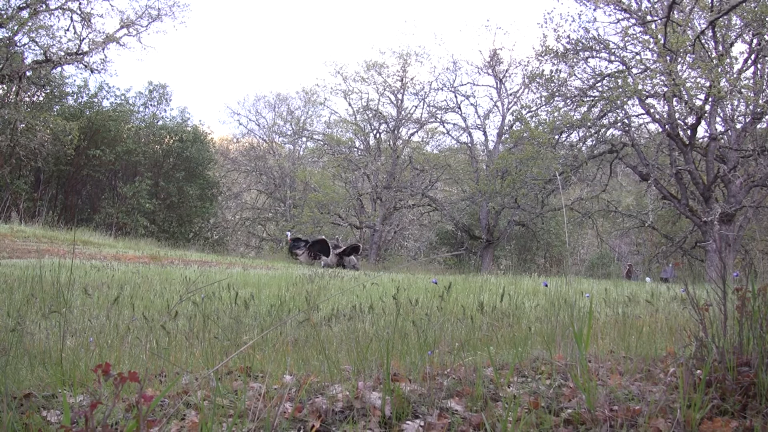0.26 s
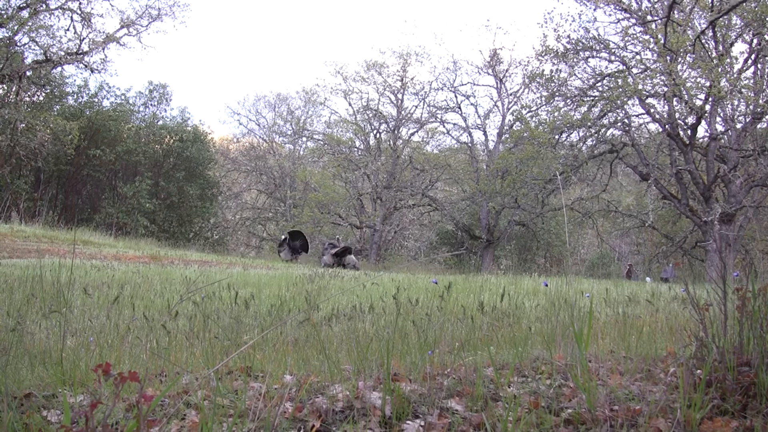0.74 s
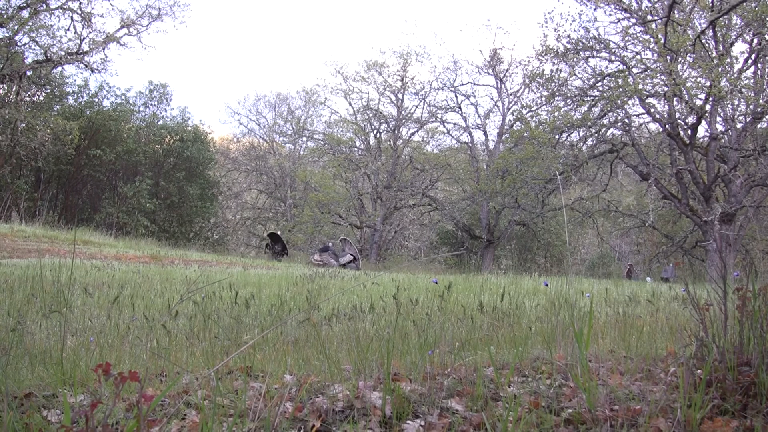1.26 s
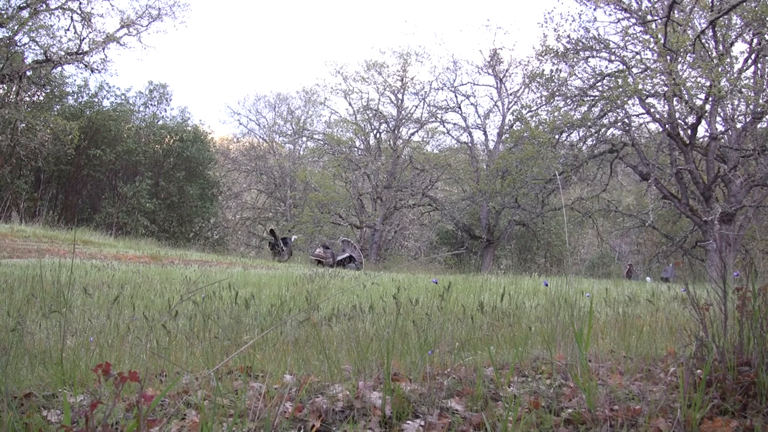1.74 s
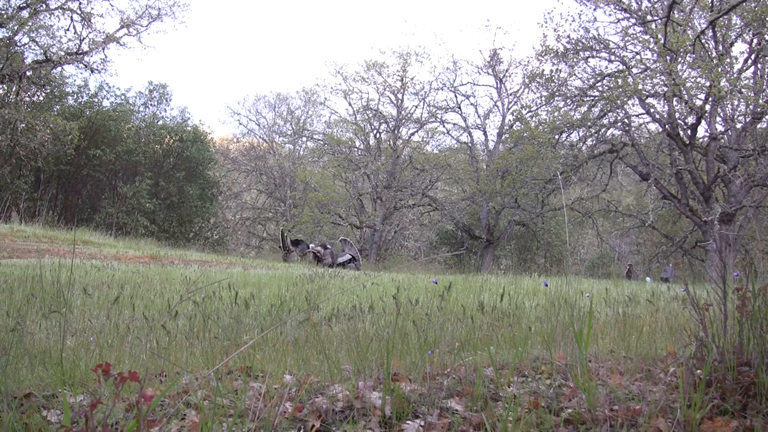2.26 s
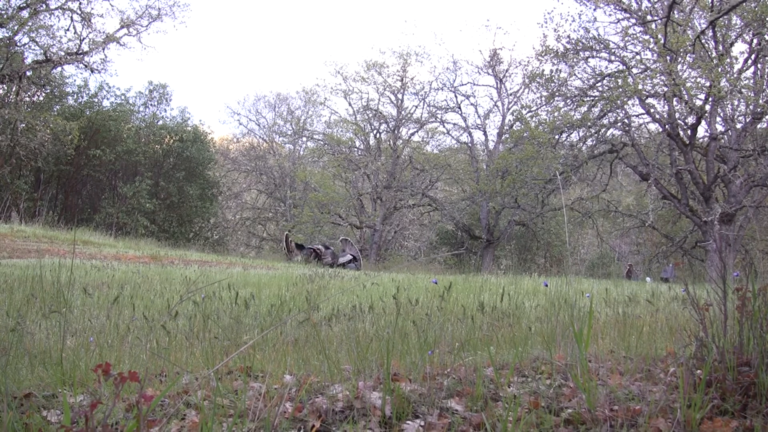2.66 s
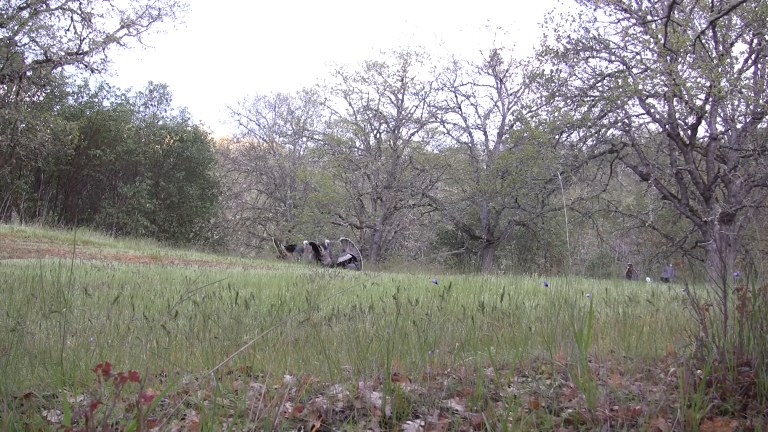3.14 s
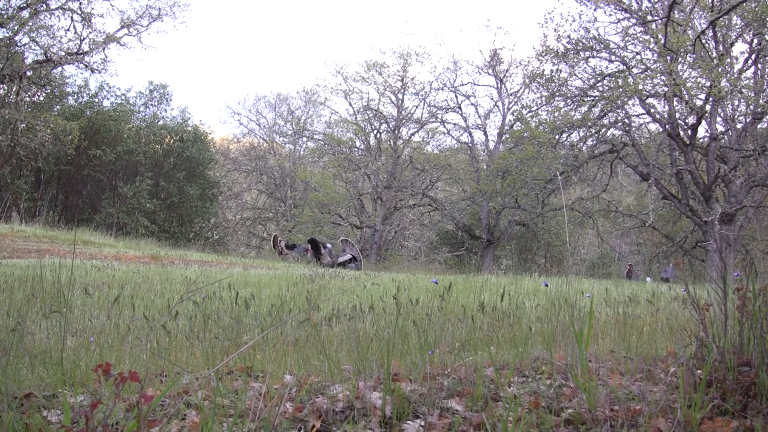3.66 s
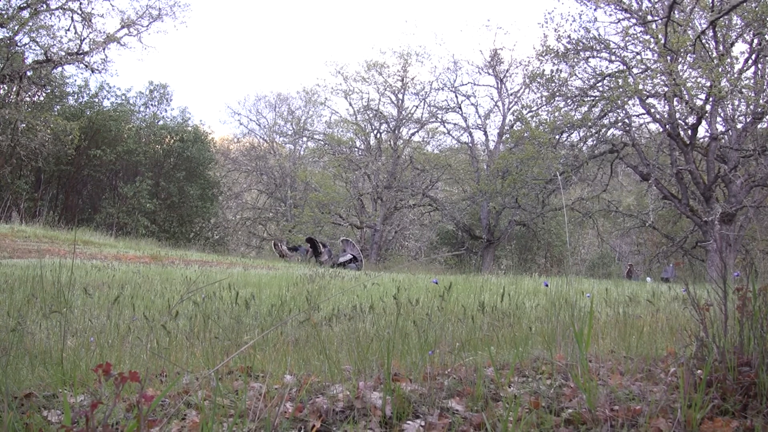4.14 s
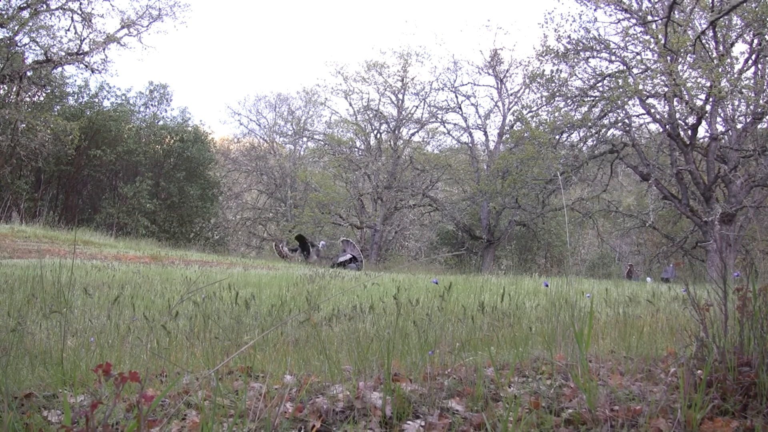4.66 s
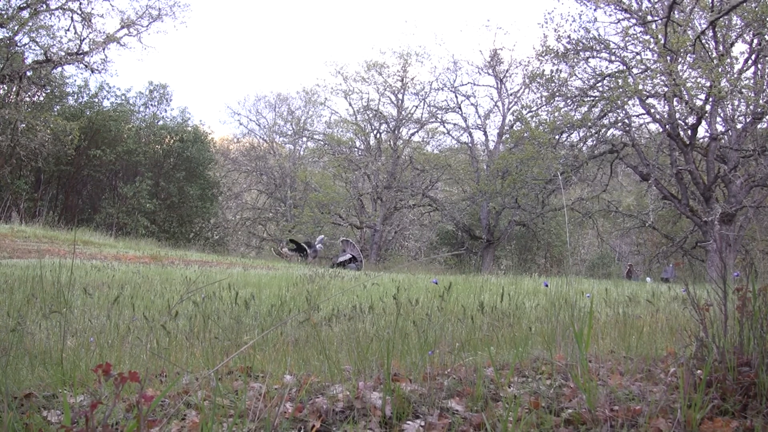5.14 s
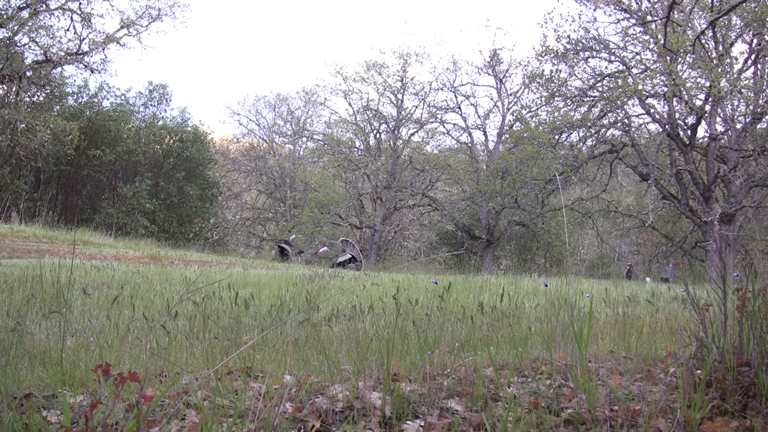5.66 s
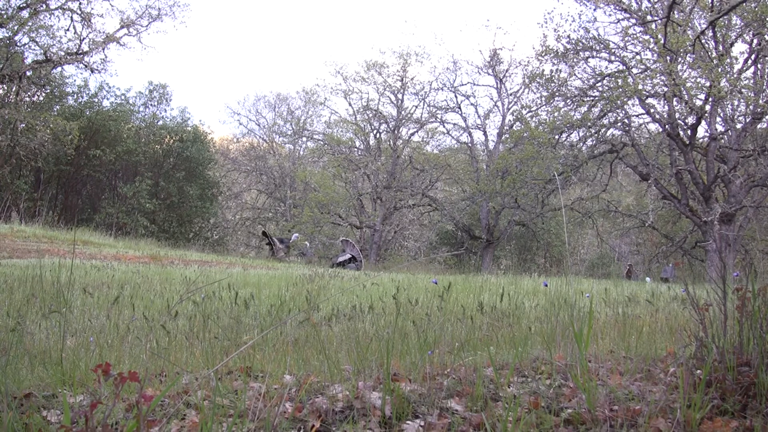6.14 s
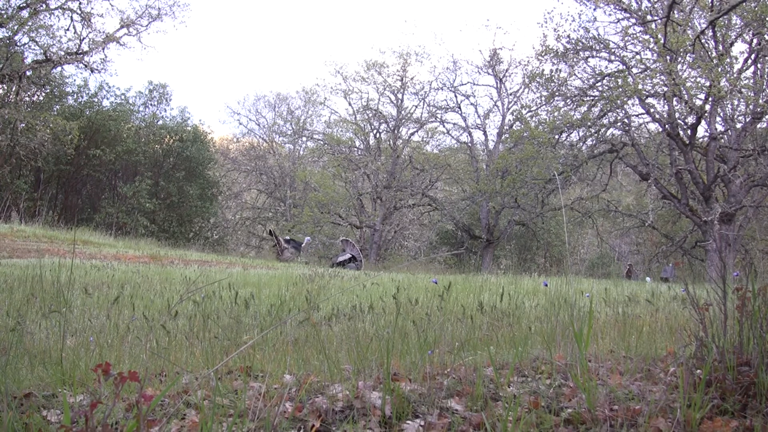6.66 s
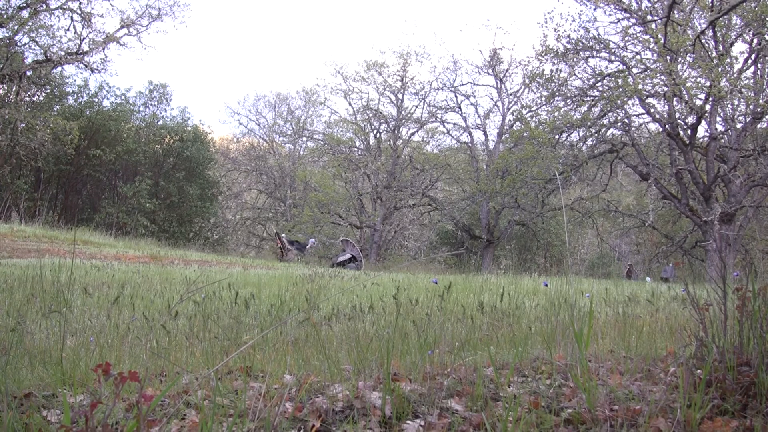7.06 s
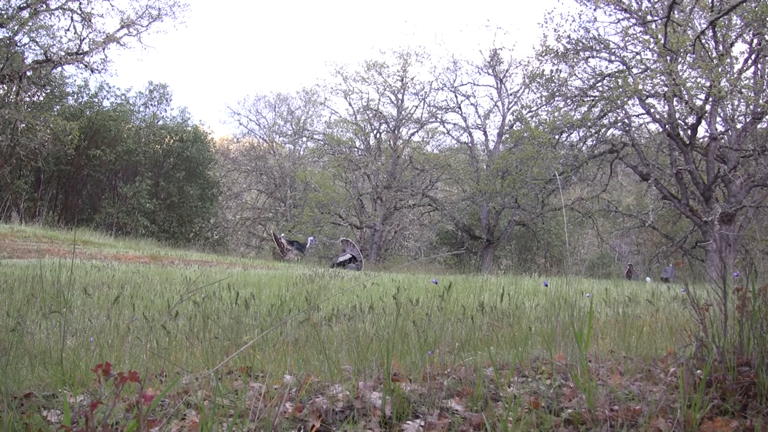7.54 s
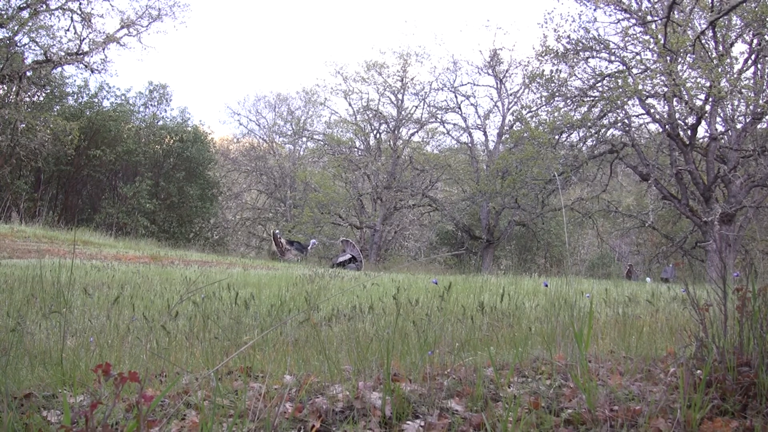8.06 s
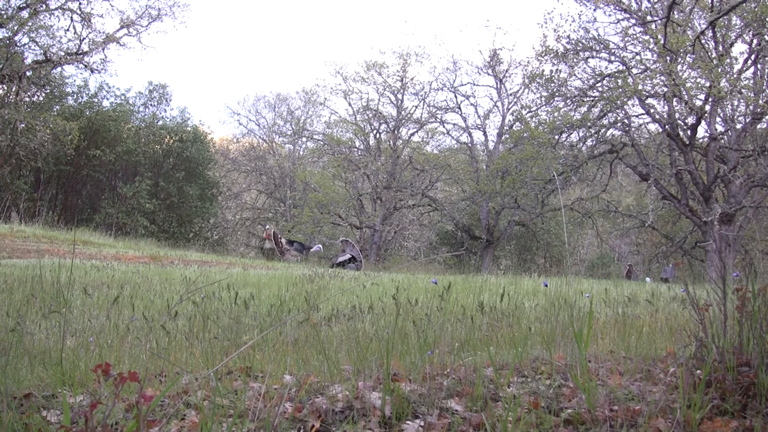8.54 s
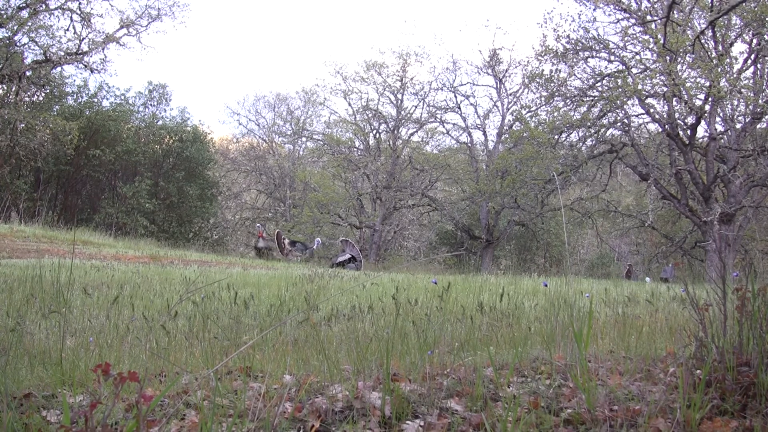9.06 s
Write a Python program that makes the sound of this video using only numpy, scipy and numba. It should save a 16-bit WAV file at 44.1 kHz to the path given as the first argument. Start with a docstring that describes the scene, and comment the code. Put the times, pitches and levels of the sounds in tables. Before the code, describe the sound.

Stereo outdoor pickup, close to a hen turkey and far from the others. First a songbird's sliding whistle and fast repeated chirps, with dull bumps and brief rustling near the microphone. Then a low murmur, a stuttered cluck and five evenly spaced, very loud raspy yelps, the background dipping after each. A one-second tumbling gobble from distant males follows with light echo from trees, then calm airy hiss with sparse hoarse clucks.

```python
"""A spring meadow: faint wind and rumble lie far off under an even hiss. A small bird whistles in even phrases;
soft bumps (damped modes) and dry rustles (grainy noise) come from near the microphone, and hoarse, rising
clucks from afar. Right beside the microphone a hen murmurs, clucks and gives five loud yelps whose voice
breaks to half and quarter pitch; toms across the grass answer with a rattling gobble of climbing syllables.
Bird and clucks return once more. The recorder's gain control ducks the background after every yelp."""
import sys
import numpy as np
from scipy import signal
from scipy.fft import rfft, irfft
from scipy.io import wavfile
from scipy.ndimage import map_coordinates
from numba import njit

SR = 44100
rng = np.random.default_rng(int(sys.argv[2]) if len(sys.argv) > 2 else 0)


def digitize_waveform(pressure):
    """Quantize a signal to 16-bit integers and store it at the path in sys.argv[1].

    Rows of a 2-D input are taken as channels; values are limited to [-1, 1].
    """
    field = np.atleast_2d(pressure).T
    bounded = np.clip(field, -1, 1)
    quanta = np.round(bounded * 32767).astype(np.int16)
    wavfile.write(sys.argv[1], SR, quanta)


N = 410571


def undb(db):
    """Decibels to gain."""
    return 10 ** (np.asarray(db) / 20)


def unit(x):
    """Scale to rms 1."""
    return x / np.sqrt(np.mean(x ** 2) + 1e-18)


def clock(length):
    """Sample times of an event."""
    return np.arange(max(int(length * SR), 32)) / SR


def add(track, start, x):
    """Mix an event into a track."""
    i = int(start * SR)
    track[i:i + len(x)] += x[:max(N - i, 0)]


def wobble(n, rate):
    """Smooth chance with a spread of about 1 and `rate` new values a second."""
    knots = rng.standard_normal(4096)
    return map_coordinates(knots, [np.arange(n) * rate / SR], order=3, mode="wrap")


def swell(u, edge):
    """Window over u = 0..1 with rounded edges of the given share."""
    return np.sin(np.pi / 2 * np.clip(np.minimum(u, 1 - u) / edge, 0, 1)) ** 2


def running_phase(pitch):
    """Phase [rad] of a tone whose pitch [Hz] changes from sample to sample."""
    return 2 * np.pi * np.cumsum(pitch) / SR


def curve(points, hz):
    """Read (frequency [Hz], level [dB]) points on a log-frequency axis."""
    f, db = np.transpose(points)
    return np.interp(np.log(hz + 1), np.log(f), db)


def colour(x, points):
    """Causal minimum-phase filter with the given (frequency [Hz], gain [dB]) response."""
    size = 2048
    cepstrum = irfft(np.log(undb(curve(points, np.fft.rfftfreq(size, 1 / SR)))))
    # fold the cepstrum forward in time so the filter never rings ahead of the sound
    cepstrum[1:size // 2] *= 2
    cepstrum[size // 2 + 1:] = 0
    return signal.fftconvolve(x, irfft(np.exp(rfft(cepstrum))))[:len(x)]


def meadow(x, pan_db, echo_db, t60):
    """Direct sound plus thin scatter from the tree line, partly alike in both ears."""
    t = clock(1.1)
    decay = undb(-60 * t / t60) * (1 - np.exp(-t / .015))
    shared, left, right = rng.standard_normal((3, len(t))) * decay
    ears = []
    for own in (left, right):
        scatter = unit(shared + .5 * own) / np.sqrt(len(t))
        ears.append(x + undb(echo_db) * signal.fftconvolve(x, scatter)[:N])
    return np.array(ears) * undb(np.array([[pan_db], [-pan_db]]) / 2)  # positive pan leans left


# spectrum of the distant air: (frequency [Hz], relative level [dB])
AIR_SPECTRUM = [(15, -47.5), (25, -37), (43, -11), (183, 0.5), (404, -6.5), (506, -2.5), (649, -3),
                (874, -4), (1150, -10), (1840, -24), (2190, -24), (2360, -30.5), (2670, -27.5), (7230, -35),
                (9500, -45), (12400, -76), (20900, -120)]
# its width, before a further 1 dB cut of the side: (frequency [Hz], side minus mid [dB])
AIR_WIDTH = [(60, -11), (100, -5), (180, -8), (320, -6), (560, -5), (980, -9), (1720, -5), (3000, -1.5),
             (5240, 0), (9170, 1)]
# its loudness through the take, before flicker and pan: (time [s], level [dB])
AIR_LEVEL = [(0, -43), (1.1, -44.5), (2.7, -43.5), (4.5, -44.5), (6.3, -44), (9.3, -45)]


def air(flicker_db=0.9, pan_db=2):
    """Far-off wind and rumble, wavering slightly, under an even hiss: two shaped noises, mid and side."""
    hz = np.fft.rfftfreq(N, 1 / SR)
    mid, side = (rfft(rng.standard_normal(N)) * undb(curve(AIR_SPECTRUM, hz)) for _ in range(2))
    mid, side = irfft(mid, N), irfft(side * undb(curve(AIR_WIDTH, hz) - 1), N)
    db = np.interp(np.arange(N) / SR, *np.transpose(AIR_LEVEL)) + flicker_db * wobble(N, 12)
    ears = np.array([[1], [-1]])
    return (mid + ears * side) / mid.std() * undb(db) * undb(ears * pan_db / 2)


# songbird syllables by name: (length [s], buzz depth [Hz], pitch contour [Hz])
BIRD_SYLLABLES = {"slide": (0.223, 0, [4650, 3950, 3510, 3490, 3396, 2750, 2500, 2340]),
                  "peak": (0.046, 0, [5300, 6400, 7400, 6100, 5300]),
                  "whistle": (0.096, 0, [2340, 2560, 2580, 2574, 2420]),
                  "buzz": (.047, 450, [4450, 4600, 4800]), "high buzz": (0.04, 430, [4800, 4950, 4850]),
                  "hook": (.088, 0, [7300, 7450, 7470, 7430, 7400, 7000, 5900]),
                  "arch": (0.049, 0, [2470, 2607, 2466, 2270]),
                  "flick": (.034, 1200, [3940, 4135, 4170, 4410, 5050]),
                  "pip": (0.068, 0, [4220, 4200, 4200])}
# phrases, each one syllable repeated evenly, dry and before flutter:
# (time [s], syllable, repeats, period [s], first level [dB], last level [dB])
BIRD_PHRASES = [(0.171, "slide", 1, 0, -42.5, -43), (0.462, "peak", 2, .06, -59, -54.5),
                (.606, "whistle", 1, 0, -46, -45), (.767, "buzz", 2, .18, -44.5, -45.5),
                (.826, "hook", 4, .182, -58.5, -50.5), (1.127, "high buzz", 2, .179, -40, -41),
                (1.516, "arch", 6, .1212, -46.5, -42), (1.574, "flick", 6, .1209, -43, -43.5),
                (5.975, "pip", 1, 0, -58.5, -54)]


def songbird(buzz_hz=230):
    """Near-pure whistles repeated in even phrases; the buzzy syllables carry a fast vibrato."""
    edge, waver, flutter_db = .35, .004, 2.5  # share of length, share of pitch, dB
    out = np.zeros(N)
    for start, name, count, period, first_db, last_db in BIRD_PHRASES:
        length, depth, contour = BIRD_SYLLABLES[name]
        t = clock(length)
        u = t / length
        position = u * (len(contour) - 1)
        glide = map_coordinates(np.array(contour, float), [position], order=3, mode="nearest")
        buzz_depth = depth * (u ** 3 if name == "flick" else 1)  # a flick buzzes mostly at its end
        fade = swell(u, edge if depth else min(edge, 0.0072 / length))
        for k, db in enumerate(np.linspace(first_db, last_db, round(count))):
            vibrato = buzz_depth * np.sin(2 * np.pi * buzz_hz * t + wobble(len(t), 191))
            pitch = glide * (1 + waver * wobble(len(t), 313)) + vibrato
            loudness = undb(db + flutter_db * wobble(len(t), 81)) * fade
            add(out, start + k * period, loudness * np.sqrt(2) * np.sin(running_phase(pitch)))
    return out


# soft bumps near the microphone, dry: (time [s], peak level [dB], favoured pitch [Hz])
BUMPS = [(0.849, -20, 220), (0.868, -21.5, 230), (0.89, -15.5, 234), (0.918, -24.5, 236),
         (1.010, -31.5, 228), (1.080, -32.5, 211), (1.126, -27.5, 239.5), (1.664, -15.5, 522),
         (2.422, -16.5, 393), (3.899, -14.5, 443), (3.949, -22, 535), (4.614, -27.5, 984),
         (4.666, -27, 800)]
# modes of the bumped body, before weighting: (mean frequency [Hz], 60 dB decay time [s], level [dB])
BUMP_MODES = [(160, 0.043, -7), (216.8, .08, -5), (266.6, 0.048, 1.5), (356.7, 0.042, -3.5), (480, .04, -1),
              (550, 0.072, -5), (800, 0.011, -12.5), (1040, .02, -2.5)]


def bumps(low_cut_hz=150):
    """Dull blows on one damped body; each favours the modes around its own pitch."""
    out, t = np.zeros(N), clock(.2)
    low_cut = signal.butter(2, low_cut_hz, "high", fs=SR, output="sos")
    for start, db, hz in BUMPS:
        ring = np.zeros(len(t))
        for f, t60, mode_db in BUMP_MODES:
            decay = undb(mode_db - 12 * np.log2(f / hz) ** 2 - 60 * t / t60)
            ring += decay * np.sin(2 * np.pi * f * t * rng.normal(1, .04))
        ring = signal.sosfilt(low_cut, ring)
        add(out, start, undb(db) * ring / np.abs(ring).max())
    return out


# dry rustles near the microphone, before their fades: (time [s], length [s], level [dB])
RUSTLES = [(.86, .08, -46.5), (1.118, .014, -39), (2.406, .061, -57.5), (2.518, .022, -46),
           (4.003, .018, -53.5), (4.384, .005, -51)]
# their colour: (frequency [Hz], relative level [dB])
RUSTLE_COLOUR = [(300, -22.5), (1500, 2), (2800, 4), (5000, -1.5), (8000, -3.5), (10000, -22)]


def rustles(grain_db=5):
    """Short, dry bursts of noise whose loudness jumps about quickly, like grains."""
    out = np.zeros(N)
    for start, length, db in RUSTLES:
        t = clock(length)
        grains = rng.standard_normal(len(t)) * undb(grain_db * wobble(len(t), 900))
        add(out, start, undb(db) * unit(colour(grains, RUSTLE_COLOUR)) * swell(t / length, 0.095))
    return out


# distant clucks, dry and before their fades: (time [s], length [s], level [dB], mid-note pitch [Hz])
CLUCKS = [(1.581, 0.033, -42, 792), (6.698, 0.017, -44.5, 1105), (6.752, 0.013, -49, 1120),
          (7.34, 0.025, -44, 785), (7.394, 0.023, -50, 780), (7.958, .010, -52, 900),
          (8.654, 0.0232, -33.5, 764), (9.197, 0.013, -45.5, 1120), (9.246, 0.016, -53, 994)]
# their colour: (frequency [Hz], relative level [dB])
CLUCK_COLOUR = [(500, -17.5), (1100, 15.5), (1700, 4), (2200, 5), (2600, -6.5), (3000, 0.5), (3600, -9),
                (4200, -2.5), (5000, -23), (9000, -22)]


def clucks(sweep=0.446, jitter=0.058, hiss=1.2):
    """Short hoarse notes, eight equal harmonics plus hiss, that sweep upward."""
    out = np.zeros(N)
    for start, length, db, hz in CLUCKS:
        t = clock(length)
        u = t / length
        phase = running_phase(hz * (1 + sweep * (u - .5) + jitter * wobble(len(t), 493)))
        voice = sum(np.cos(k * phase) for k in range(1, 9)) + hiss * rng.standard_normal(len(t))
        add(out, start, undb(db) * unit(colour(voice, CLUCK_COLOUR)) * swell(u, 0.29))
    return out


# the hen beside the microphone: a murmur and a stuttered cluck, then five yelps; levels before the throat
# (time [s], length [s], pitch [Hz], level [dB], octave level [dB], half-pitch level [dB],
#  closing rise [share of the pitch]); partials also weaken with their number
HEN_NOTES = [(2.557, 0.079, 1130, -53, 8, -28, 0.04), (2.618, .017, 1122, -9, -13, -12, 0),
             (2.647, .023, 1128, -20, 9, -26, 0.0089), (2.657, .04, 1300, -38, -2, -22.5, .25),
             (2.989, .054, 1370, -3.5, -10.5, -16.5, 0.22), (3.339, 0.073, 1430, -2, -3.5, -8, 0.38),
             (3.685, .085, 1440, 3.5, -3, -2.5, .3), (4.048, .092, 1464, 1.5, -3, -1.5, 0.17),
             (4.407, 0.097, 1535, -1.5, -0.5, -6, 0.35)]
# resonances of the hen's throat: (frequency [Hz], gain [dB])
HEN_THROAT = [(200, -40), (400, -24.5), (730, -16), (900, -13), (1150, -6.5), (1500, -3.5), (1900, -2.5),
              (2200, -1.5), (2500, -5), (2850, 2.5), (3150, -20), (3550, -10), (4200, -31.5), (8500, -24)]
# hiss of the yelp before the throat: (frequency [Hz], relative level [dB])
BREATHINESS = [(300, -18.5), (1500, -9.5), (3500, -4.5), (4600, -2), (5050, 1.5), (5700, -2), (6500, 8),
               (7600, -3.5), (8500, 0.5), (9600, -20)]
BREAK_FROM, BREAK_SPAN = 0.18, .58  # part of each note in which the voice breaks (shares of its length)
GROWL_DB, GROWL_SLOPE = -18, -.55  # quarter-pitch growl in the break (dB); it falls per dB of half pitch


def yelps(rough=0.75, calm=0.62, flip=0.1292, fade_s=0.029, hiss_db=-13):
    """A rough whistle that breaks to half and quarter pitch in mid-note, then flicks up as it dies."""
    jitter = .03  # share of the pitch
    out = np.zeros(N)
    for start, length, hz, db, over_db, half_db, rise in HEN_NOTES:
        t = clock(length)
        n, left = len(t), length - t
        broken = swell((t / length - BREAK_FROM) / BREAK_SPAN, 0.39)
        unrest = 1 - calm * broken  # the membrane steadies once it locks to the lower pitch
        overshoot = flip * (length > .06) * np.exp(-((t - .007) / .0045) ** 2)
        closing = rise * np.clip(1 - left / 0.038, 0, 1) ** 2
        phase = running_phase(hz * (1 + overshoot + closing + jitter * unrest * wobble(n, 350)))
        breath = rng.standard_normal(n) * (1 + 0.58 * np.cos(phase / 4))
        voice = undb(hiss_db) * unit(colour(breath, BREATHINESS))
        for k in np.arange(.25, 3.1, .25):  # partials in quarters of the pitch
            if k % 1 == 0:
                share = undb(over_db * (k == 2))
            else:
                break_db = half_db if k % .5 == 0 else GROWL_DB + GROWL_SLOPE * half_db
                outside = undb(-12.5) * (k > .6) * (1 - broken)
                share = broken * undb(break_db) + outside
            flutter = 1 + rough * unrest * (wobble(n, 420) + 1j * wobble(n, 700))
            turning = np.exp(1j * (k * phase + rng.uniform(0, 2 * np.pi)))
            voice = voice + share / max(k, .5) * np.real(flutter * turning)
        attack = np.minimum(t / min(.006, length / 3), 1) ** 1.5
        release = np.minimum(left / min(fade_s, length / 2), 1) ** 1.53
        add(out, start, undb(db) * np.sqrt(2) * voice * attack * release)
    return colour(out, HEN_THROAT)


# resonances of the toms' throats: (frequency [Hz], relative gain [dB])
TOM_THROAT = [(120, -23), (400, -27), (530, -2), (645, 3.5), (860, -7.5), (1150, 10), (1360, -3), (1560, 8),
              (1760, -3.5), (2080, -0.5), (2600, -20.5), (3500, -7), (3780, -15), (4000, -11), (4400, -24),
              (5000, -15), (6200, -33)]
# colour of their rasp: (frequency [Hz], relative level [dB])
TOM_RASP = [(40, -22), (120, -16), (300, -25), (480, -17.5), (650, -5), (880, -2), (1150, 3.5), (1800, -16),
            (2100, -3), (2600, -10.5), (3500, -9.5), (5400, -14.5), (6200, -18.5), (9500, -40)]


def syllable(length, hz, force_db, climb=.29, snap=0.1986, rattle_hz=120, bright_db=-1, body_db=-19):
    """One tom's syllable: the pitch climbs, holds, then snaps down, while a slow flap chops its rasp."""
    jitter, rough, rasp_db, patchy_db = .011, .15, -15, 5
    t = clock(length)
    n, u = len(t), t / length
    snapped = .5 + .5 * np.tanh((u - rng.uniform(.62, .78)) * 20)
    reach = min(length / .075, 1)  # short syllables have no time to glide far
    below = climb * np.clip(1 - u / 0.6, 0, 1) ** 1.5 + snap * snapped
    phase = running_phase(hz * (1 - reach * below + jitter * wobble(n, 282)))
    flap = np.cos(running_phase(rattle_hz * (1 + 0.26 * wobble(n, 86))))
    force = undb(bright_db + force_db) * swell(u, 0.49)  # upper harmonics bloom in mid-syllable
    pulses = np.zeros(n)
    for k in range(1, 13):
        strength = (force if k > 3 else 1) * undb(patchy_db * wobble(n, 65.8))
        roughness = 1 + rough * (flap + wobble(n, 485))
        pulses += strength * roughness * np.cos(k * phase + rng.uniform(0, 2 * np.pi))
    voice = unit(colour(pulses, TOM_THROAT)) + undb(body_db) * flap
    chopped = rng.standard_normal(n) * (1 + 0.31 * flap) * (1 + 0.43 * np.cos(phase))
    rasp = unit(colour(chopped, TOM_RASP))
    return voice * swell(u, 0.052) + undb(rasp_db + force_db) * rasp * swell(u, 0.17)


def hollow_note(length, hz, droop=0.086):
    """A short, nearly pure note, with a trace of its third harmonic, that sags in pitch."""
    t = clock(length)
    u = t / length
    phase = running_phase(hz * (1 + droop * (.5 - u) + 0.016 * wobble(len(t), 380)))
    return np.sqrt(2) * swell(u, 0.3) * (np.sin(phase) + undb(-25.0) * np.sin(3 * phase))


# gobble syllables from across the grass, dry and before their fades:
# (time [s], length [s], voice level [dB], hollow note level [dB], closing low note level [dB])
GOBBLE_SYLLABLES = [(4.973, 0.093, -27.5, -22.5, -30), (5.073, 0.038, -35, -30, -23),
                    (5.123, 0.043, -33, -25, -21), (5.187, 0.088, -27.5, -21.5, -24),
                    (5.274, .07, -27.5, -21, -29), (5.339, 0.037, -30.5, -20.5, -30),
                    (5.378, 0.085, -27, -27, -34), (5.466, .074, -26, -24.5, -33),
                    (5.559, 0.041, -32, -26, -30), (5.601, 0.052, -33.5, -19, -27.5),
                    (5.655, 0.036, -39.5, -27, -34), (5.698, .045, -31.5, -32, -25),
                    (5.757, 0.045, -33, -28.5, -31), (5.799, .034, -35, -20.5, -33),
                    (5.848, .038, -42, -25.5, -41), (5.879, .056, -39, -37, -25),
                    (5.959, 0.053, -41, -25.5, -41)]
# the two pure notes in every syllable:
# (centre [share of its length], length [share of it], mean pitch [Hz])
HOLLOW_NOTES = [(.48, .38, 1124), (.8, 0.3577, 648.3)]
# how hard the toms push, raising rasp and upper harmonics: (time [s], force [dB])
FORCE = [(4.97, 13.5), (5.14, 7), (5.28, 16), (5.45, 9.5), (5.75, 10), (5.88, 9), (6.02, -3)]
TOM_HZ, CLIMB_HZ_PER_S = 628, 1800  # the longer a syllable, the higher it climbs
HOLLOW_SCATTER = 0.026  # pitch spread of the pure notes from syllable to syllable (share)


def gobble():
    """Syllables ring hollow mid-way and close on a low note; a second tom shadows them, late and off pitch."""
    second_db = -12
    out = np.zeros(N)
    for start, length, db, *note_dbs in GOBBLE_SYLLABLES:
        hz = TOM_HZ + CLIMB_HZ_PER_S * length
        force_db = np.interp(start + length / 2, *np.transpose(FORCE))
        add(out, start, undb(db) * syllable(length, hz, force_db))
        shadow = syllable(.8 * length, hz * rng.uniform(0.89, 1.3), force_db)
        add(out, start + rng.uniform(.004, .016), undb(db + second_db) * shadow)
        for (centre, share, note_hz), note_db in zip(HOLLOW_NOTES, note_dbs):
            note = hollow_note(share * length, note_hz * rng.normal(1, HOLLOW_SCATTER))
            add(out, start + (centre - share / 2) * length, undb(note_db) * note)
    return out


def scene():
    """Set each source in the meadow; the hen is almost dry, the others carry more echo of the trees."""
    bird = meadow(songbird(), pan_db=1.2, echo_db=-9, t60=.8)
    stirring = meadow(bumps() + rustles(), pan_db=.2, echo_db=-12, t60=.6)
    far_hens = meadow(clucks(), pan_db=1.5, echo_db=-7.5, t60=0.39)
    hen = meadow(yelps(), pan_db=3.0, echo_db=-39.5, t60=0.94)
    toms = meadow(gobble(), pan_db=1.4, echo_db=-10, t60=.65)
    return air() + bird + stirring + far_hens + hen + toms


@njit
def gain_control(peak, top, attack_s, release_s):
    """Gain that drops fast when the sound exceeds `top` and creeps back."""
    out, gain = np.empty(len(peak)), 1.
    for i in range(len(peak)):
        wanted = min(1., top / (peak[i] + 1e-9))
        gain += (wanted - gain) / (SR * (attack_s if wanted < gain else release_s))
        out[i] = gain
    return out


TOP_HZ = 9650  # upper edge of what the recorder keeps


def record(dry):
    """Gain control lets each yelp's onset overshoot into soft clipping; a steep low-pass cuts the top."""
    loudest = np.abs(dry).max(axis=0)  # both ears share one gain
    held = dry * gain_control(loudest, top=0.38, attack_s=0.0031, release_s=0.18)
    clipped = held / (1 + held ** 6) ** (1 / 6)
    return signal.sosfilt(signal.ellip(8, .2, 66, TOP_HZ, fs=SR, output="sos"), clipped)


dry = scene()
out = record(dry)
digitize_waveform(out)
```